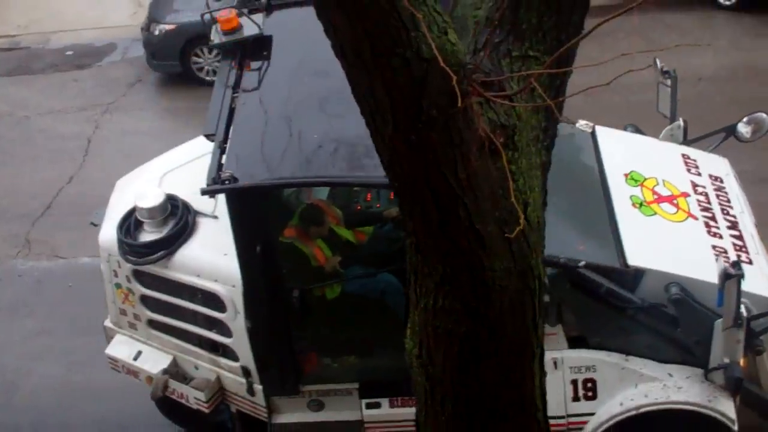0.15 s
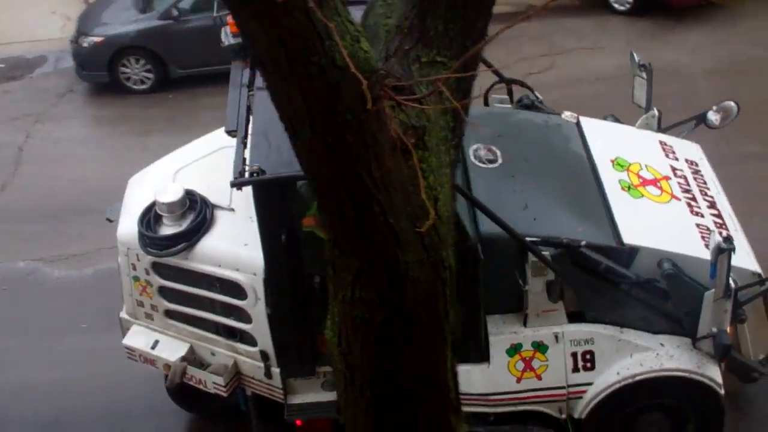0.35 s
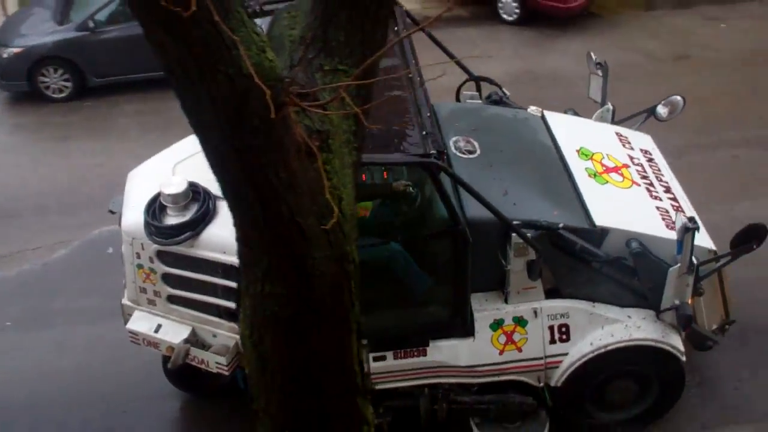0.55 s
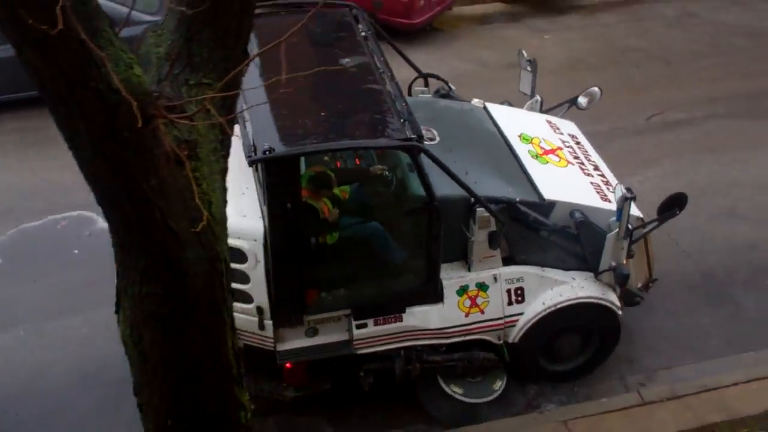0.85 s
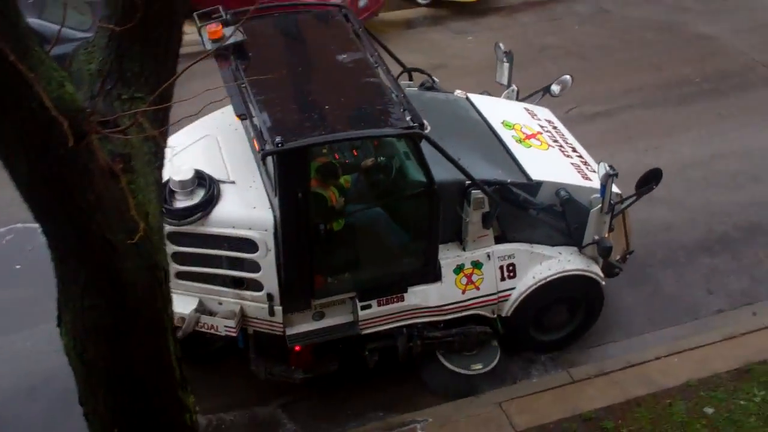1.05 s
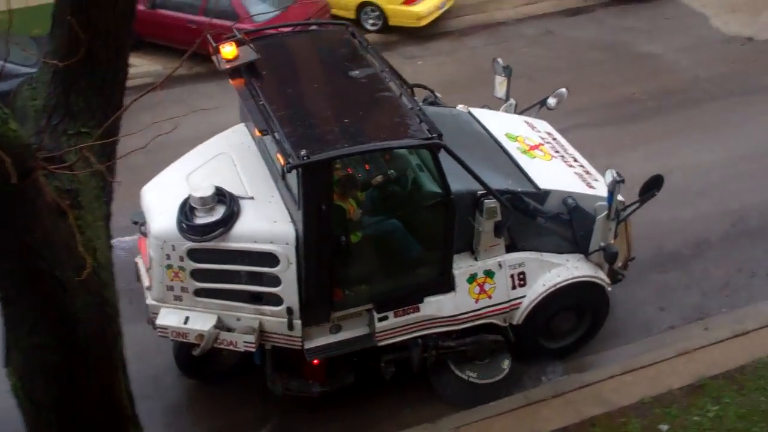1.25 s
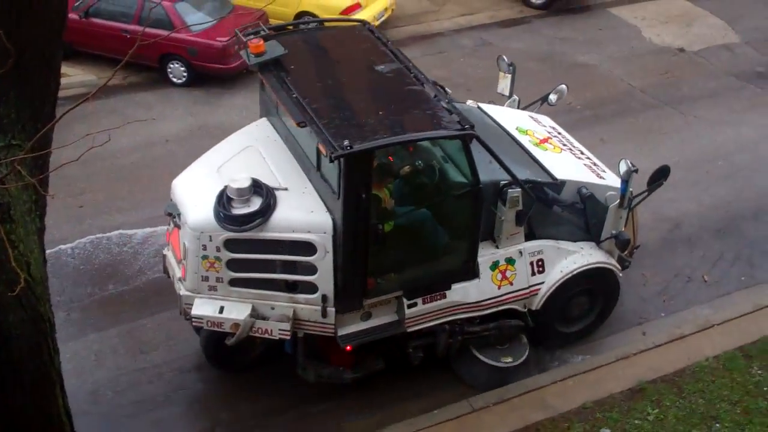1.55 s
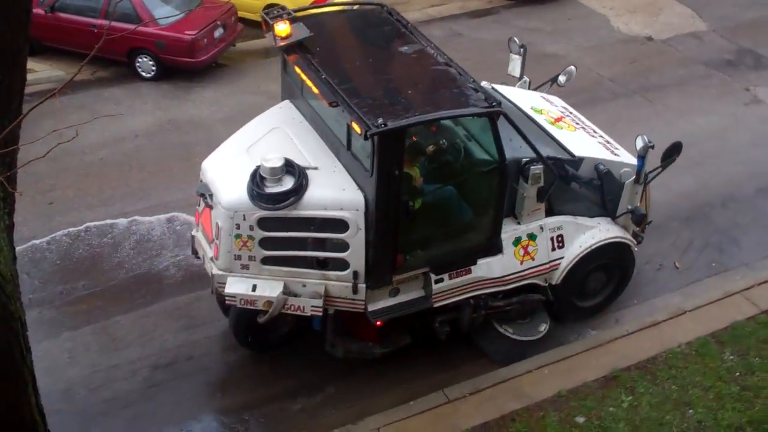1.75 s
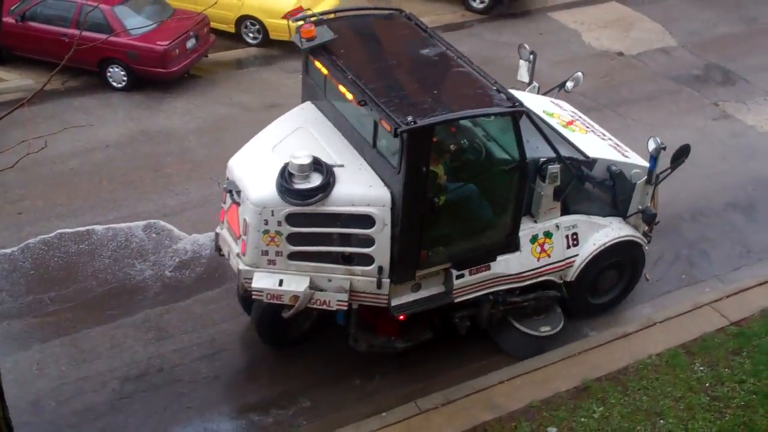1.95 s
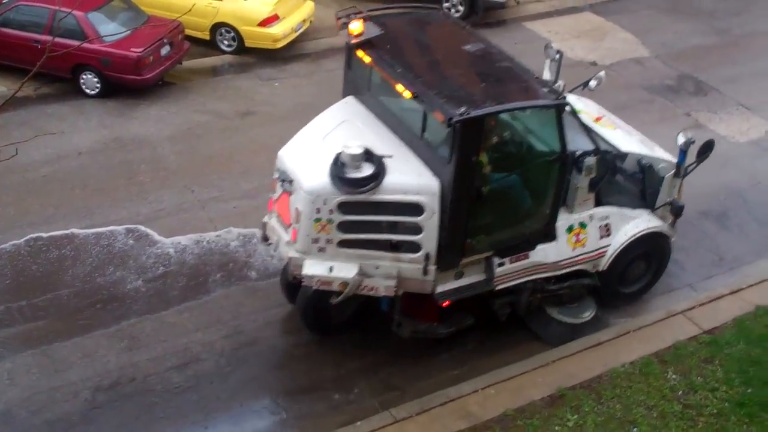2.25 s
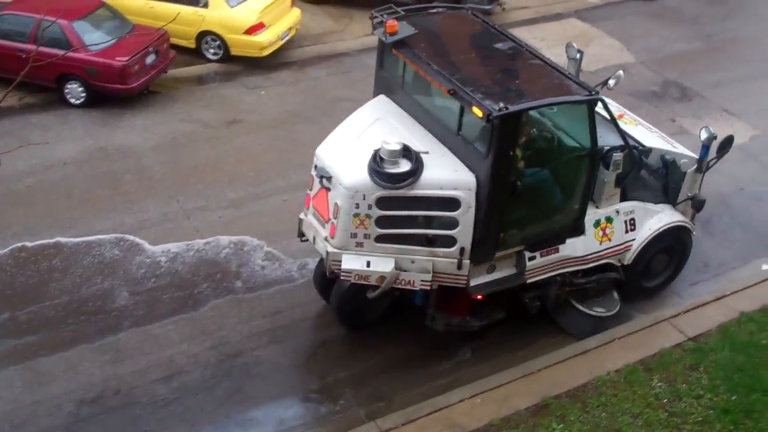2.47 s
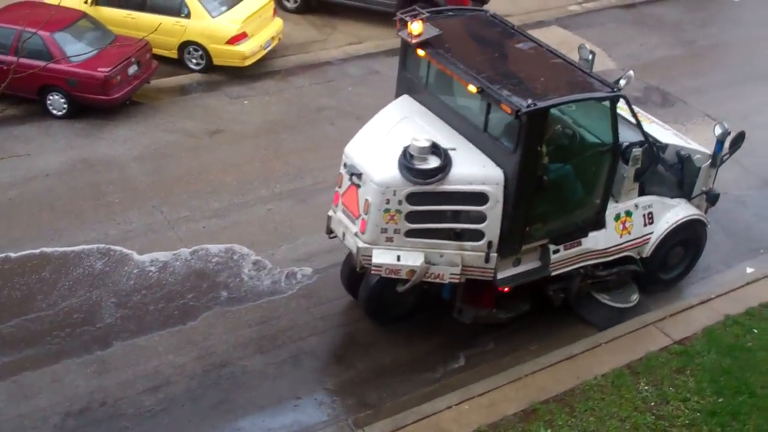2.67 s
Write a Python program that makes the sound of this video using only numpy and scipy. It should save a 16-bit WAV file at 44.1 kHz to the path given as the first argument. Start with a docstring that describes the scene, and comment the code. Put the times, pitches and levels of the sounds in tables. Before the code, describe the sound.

A street sweeper passes on a wet street: dense brush and water hiss, softer and duller at first, growing bright and strong by about 0.9 seconds and holding to the end near 2.8. Beneath run a steady low engine roar and fan hum. A faint drone sounds until 0.5; pump whine rises around 0.7-1.1 and again near 2.3. Stereo, louder on the right, with no clear fade.

```python
"""Wet street, heard from above: a street sweeper drives out from behind a tree.
Brushes and water hiss as shaped random spectra, over a low roar made the same way.
Wavering sines give the engine's firing tones, pump whine, fan hum, a faint tone and a brief drone.
Two close microphone ports hear it louder on the right; the band ends near 14 kHz."""
import sys
import numpy as np
from scipy import signal
from scipy.io import wavfile
from scipy.ndimage import uniform_filter1d

SR = 44100
rng = np.random.default_rng(int(sys.argv[2]) if len(sys.argv) > 2 else 0)


def wav_out(sig):
    """Save sig, one row per channel (or a flat mono array), as 16-bit PCM at SR to the path in sys.argv[1]."""
    wavfile.write(sys.argv[1], SR, np.round(np.clip(np.atleast_2d(sig).T, -1, 1) * 32767).astype(np.int16))


N = 123921  # samples
HOP = 256  # samples between spectrum frames

# Brush hiss during the pass: (time [s], gain [dB], treble tilt [dB/octave], share of port phase lead [0-1.5],
# lift of the top band [dB], shift of left minus right [dB])
HISS_PASS = [(0, -28.5, 0.5, .1, -1, 0), (.22, -30, -1, 0.1, -0.5, 0), (.4, -27.5, -1, 0.9, -1.5, 0),
             (.66, -26, -0.5, .8, -2, 0.5), (.87, -22.5, 1, 0.82, -2, 0.5), (1.2, -22, 1, 0.91, -3, 0),
             (1.48, -22.5, 0.5, .8, -3, 0), (1.62, -23, 0, 0.87, 0.5, 0.5), (1.75, -23, -1, .8, 1, 0),
             (1.9, -24, 0, 1.07, -1.5, 0.5), (2.14, -23.5, 0.5, 1.2, -3, -.3),
             (2.3, -23.5, -0.5, 1.28, -3.5, 0), (2.45, -21.5, 1, 1.37, -2.5, -.7),
             (2.62, -24.5, -0.5, 1.4, -2, -0.5), (2.81, -24, 0.5, 1.4, -1, -0.5)]
# Brush hiss spectrum: (frequency [Hz], relative density [dB])
HISS_SPECTRUM = [(900, -42), (1400, -16), (2300, -11.5), (3000, -6), (4500, -5.5), (7000, -6),
                 (10500, -5.5), (12500, -2), (13600, 1.5), (14000, 3), (14300, -2)]
HISS_FALL_DB_PER_OCTAVE, TILT_PIVOT_HZ, TOP_START_HZ = -60, 6900, 11000

# Roar gains: (time [s], low roar [dB], upper roar [dB], bodywork band [dB])
ROAR_GAINS = [(0, -34, -35.5, -54), (.3, -35.5, -35, -55), (.58, -37, -35.5, -51), (.85, -34.5, -37, -44.5),
              (1.3, -37.5, -35, -42.5), (1.7, -35.5, -34.5, -38), (2.05, -36.5, -36.5, -42),
              (2.4, -35.5, -36, -41), (2.81, -36, -35, -41.5)]
# Low roar spectrum: (frequency [Hz], relative density [dB])
LOW_ROAR_SPECTRUM = [(15, -57), (25, -41), (81, -22.5), (123, -11), (215, -2), (296, 2.5), (335, -1),
                     (394, -6.5), (480, -14), (620, -56), (1060, -120)]
# Upper roar spectrum: (frequency [Hz], relative density [dB])
UPPER_ROAR_SPECTRUM = [(300, -15), (420, -3), (500, -6), (680, -5.5), (810, -6.5), (1040, -2), (1280, -8.5),
                       (1600, -6), (2200, -11), (3200, -11), (4500, -40)]
# Bodywork resonance: (frequency [Hz], relative density [dB])
BODYWORK_SPECTRUM = [(440, -34), (520, -4), (575, -1), (640, -7), (740, -22)]

# Engine orders: (time [s], second order [Hz], second-order level [dB], first-order level [dB])
ENGINE_ORDERS = [(0, 125.8, -43.5, -55), (.3, 127.4, -44, -58), (.6, 127, -49, -54), (.82, 129, -56, -55.5),
                 (1.0, 129.8, -50.5, -64), (1.22, 130, -42.5, -64), (1.45, 129, -48, -62),
                 (1.6, 127.3, -47.5, -55), (2.05, 127.2, -43, -57), (2.5, 127.2, -45.5, -55),
                 (2.81, 128.4, -46, -51)]
# Pump whine: (time [s], fundamental [Hz], level [dB], third-harmonic level [dB])
PUMP_WHINE = [(0, 351, -49, -45), (.3, 351, -47, -49), (.45, 351.2, -41, -54), (.6, 355.5, -49, -46),
              (.72, 360, -37, -48.5), (1.05, 358.8, -37, -53), (1.2, 356, -43.5, -43), (1.5, 352, -52, -48),
              (1.9, 356, -52, -56), (2.15, 354.7, -48, -47), (2.33, 359, -36, -45), (2.5, 357.8, -43, -49),
              (2.81, 357, -46.5, -56)]
PUMP_SECOND_DB, PUMP_FOURTH_DB = -13, -12.5  # relative to the fundamental
# Fan hum: (time [s], frequency [Hz], level [dB])
FAN_HUM = [(0, 302.4, -44), (.2, 302, -41), (.45, 300.2, -43), (.8, 305.4, -48), (1.13, 308.3, -43),
           (1.4, 302.6, -44), (1.6, 302.6, -43.5), (2.0, 305.5, -44), (2.3, 301.6, -40.5),
           (2.6, 304.3, -42), (2.81, 303.4, -39)]
# Faint tone near 1 kHz: (time [s], frequency [Hz], level [dB])
FAINT_TONE = [(0, 1010, -58), (.9, 1014, -57), (1.3, 1019, -50), (1.65, 1010, -52), (2.1, 1018, -52.5),
              (2.81, 1015, -56)]
# Brief drone: (start [s], end [s], base pitch [Hz])
DRONE_SPAN = (0.05, 0.525, 224.5)
# Drone harmonics: (multiple of base pitch [-], level [dB])
DRONE_HARMONICS = [(2, -45), (3, -46.5), (4, -52), (6, -53.5), (7, -55), (8, -50.5)]
DRONE_FADE_S = 0.046

# Likeness of the two ports: (frequency [Hz], likeness [0-1])
PORT_LIKENESS = [(60, .75), (150, .92), (330, .98), (900, .95), (1500, .83), (2300, .66), (2900, .6),
                 (3700, .82), (4400, .68), (5600, .6), (7000, .52), (9000, .46), (14000, .44)]
# Port balance: (frequency [Hz], left minus right [dB])
PORT_BALANCE = [(60, -4.5), (99, -7.5), (160, -6), (270, -7.5), (450, -8.5), (740, -6), (1220, -6.0),
                (2010, -5.5), (3320, -2), (5480, -1.5), (9050, -4.5), (14900, -7)]
# Phase lead of the left port at share 1: (frequency [Hz], lead [rad])
PORT_LEAD = [(60, 0), (3500, 0), (5600, -.15), (7000, -.9), (10000, -1.2), (12000, -1.8), (14200, -2.1)]
BAND_EDGE_HZ = 14225


def brushes(t):
    """Bristles and water on the wet road: dense random hiss, quieter at first behind the tree."""
    def shape_db(hz, time_s):
        _, tilt_db, _, top_db, _ = curves(HISS_PASS, time_s)
        tilt_octaves = np.log2((hz + 1) / TILT_PIVOT_HZ)
        top = np.clip(3 * np.log2((hz + 1) / TOP_START_HZ), 0, 1)  # full after 1/3 octave
        spectrum_db = read(HISS_SPECTRUM, hz, HISS_FALL_DB_PER_OCTAVE)
        return spectrum_db + tilt_db * tilt_octaves + top_db * top
    return rush(shape_db, curves(HISS_PASS, t)[0], patchy_db=0.86, swell_db=0.47)


def roar(t):
    """Broadband rumble of engine and fan, an upper roar, and noise in a bodywork resonance."""
    low_db, upper_db, body_db = curves(ROAR_GAINS, t)
    low = rush(lambda hz, _: read(LOW_ROAR_SPECTRUM, hz, -18), low_db, patchy_db=0.5, swell_db=0.5)
    body = rush(lambda hz, _: read(BODYWORK_SPECTRUM, hz, -40), body_db, patchy_db=-0.7, swell_db=0.2)
    upper = rush(lambda hz, _: read(UPPER_ROAR_SPECTRUM, hz, -11), upper_db, patchy_db=0.96, swell_db=0.9)
    return low + body + upper


def engine(t):
    """First and second firing orders, an octave apart, as two sines."""
    second_hz, second_db, first_db = curves(ENGINE_ORDERS, t)
    first = tone(second_hz / 2, first_db, waver_db=3.5, wander=0.002, skew_rad=0.52)
    second = tone(second_hz, second_db, waver_db=-1.0, wander=0.0016, skew_rad=0.55)
    return first + second


def pumps(t):
    """Pump whine: a gliding fundamental with its second to fourth harmonics."""
    hz, level_db, third_db = curves(PUMP_WHINE, t)
    levels_db = [level_db, level_db + PUMP_SECOND_DB, third_db, level_db + PUMP_FOURTH_DB]
    return sum(tone(k * hz, db, waver_db=1.0, wander=0.0015, skew_rad=0.2)
               for k, db in enumerate(levels_db, start=1))


def fan(t):
    """Fan hum: one sine near 300 Hz with wandering pitch."""
    return tone(*curves(FAN_HUM, t), waver_db=0.0, wander=0.0048, skew_rad=0.16)


def drone(t):
    """Brief stack of harmonics without its fundamental."""
    start_s, end_s, hz = DRONE_SPAN
    window = np.clip(np.minimum(t - start_s, end_s - t) / DRONE_FADE_S, 0, 1)
    return window * sum(tone(k * hz + 0 * t, db) for k, db in DRONE_HARMONICS)


def faint_tone(t):
    """One faint sine near 1 kHz, wavering in level and pitch."""
    return tone(*curves(FAINT_TONE, t), waver_db=1.5, wander=0.004)


def rush(shape_db, gain_db, patchy_db, swell_db):
    """Noise from random short-time spectra with drifting patches and a swell shared by all bins."""
    frames = N // HOP + 5
    hz = np.fft.rfftfreq(4 * HOP, 1 / SR)[:, None]
    t = np.arange(frames) * HOP / SR
    a, b, c, d, patches = rng.standard_normal((frames, len(hz), 5)).T
    patches = uniform_filter1d(patches, size=24, axis=0)  # over bins
    patches = evened(uniform_filter1d(patches, size=16, axis=1))  # over frames
    swell_hz = np.geomspace(3, 30, 20)
    swell = evened(sum(np.sin(2 * np.pi * (f * t + rng.random())) for f in swell_hz))
    bin_gain = amp(shape_db(hz, t) + patchy_db * patches + swell_db * swell)
    _, _, share, _, shift_db = curves(HISS_PASS, t)
    spectra = ports(a + 1j * b, c + 1j * d, hz, share, shift_db) * bin_gain
    x = signal.istft(spectra, nperseg=4 * HOP, noverlap=3 * HOP)[1][:, :N]
    return amp(gain_db) * x / np.sqrt(np.mean(x.mean(0) ** 2))  # unit RMS of the port mean, then gain


def tone(hz, level_db, waver_db=-0.5, wander=0.0034, skew_rad=0.36):
    """A sine wavering in level (RMS dB) and pitch (RMS fraction); port phase drifts by skew (RMS)."""
    slow = rng.standard_normal((N, 3)).T
    pitch, level, phase = (evened(uniform_filter1d(uniform_filter1d(v, size=1500), size=1500))
                           for v in slow)
    turn = 2 * np.pi * (np.cumsum(hz * (1 + wander * pitch)) / SR + rng.random())
    side = amp(read(PORT_BALANCE, np.mean(hz)))
    both = np.array([side * np.cos(turn + skew_rad * phase), np.cos(turn)])
    return np.sqrt(2) * 2 / (1 + side) * amp(level_db + waver_db * level) * both


def ports(a, b, hz, share, shift_db):
    """Spreads noise over two ports by likeness, phase and balance; their sum keeps its power."""
    same = np.clip(read(PORT_LIKENESS, hz), 0, 1)
    side = amp(read(PORT_BALANCE, hz) + shift_db)
    lead_rad = read(PORT_LEAD, hz) * share
    left = side * (same * a + np.sqrt(1 - same ** 2) * b) * np.exp(1j * lead_rad)
    return 2 * np.array([left, a]) / np.sqrt(1 + side ** 2 + 2 * side * same * np.cos(lead_rad))


def curves(table, t):
    """Every column after time, joined by straight lines."""
    time_s, *columns = np.transpose(table)
    return [np.interp(t, time_s, column) for column in columns]


def read(points, hz, fall_db=0):
    """Reads a spectrum on a log axis, changing by fall_db per octave outside its ends."""
    f, value = np.transpose(points)
    octaves_out = abs(np.log2(np.clip(hz, f[0], f[-1]) + 1) - np.log2(hz + 1))
    return np.interp(np.log(hz + 1), np.log(f + 1), value) + fall_db * octaves_out


def evened(x):
    """Scales to unit RMS."""
    return x / np.sqrt(np.mean(abs(x) ** 2) + 1e-20)


def amp(db):
    """Decibels to amplitude ratio."""
    return 10 ** (np.asarray(db) / 20)


def scene():
    """Sums all sources at the two ports."""
    t = np.arange(N) / SR
    return brushes(t) + roar(t) + engine(t) + pumps(t) + fan(t) + drone(t) + faint_tone(t)


def record(dry):
    """Band limit: a steep linear-phase low-pass on both ports."""
    lowpass = signal.firwin(2047, BAND_EDGE_HZ, window=("kaiser", 9), fs=SR)
    return signal.oaconvolve(dry, lowpass[None], "same")


dry = scene()
out = record(dry)
wav_out(out)
```